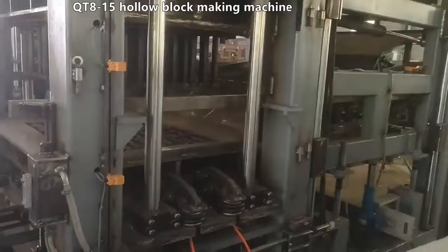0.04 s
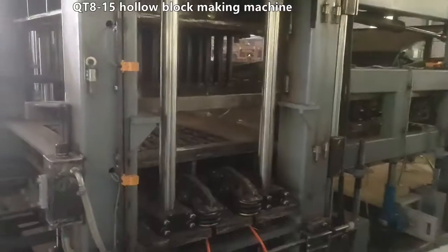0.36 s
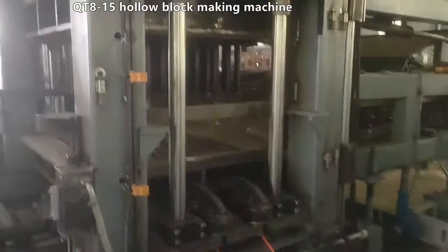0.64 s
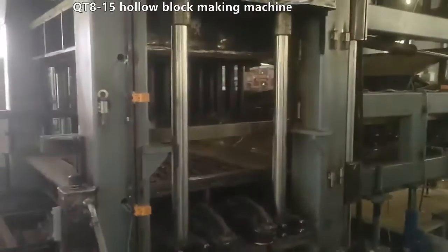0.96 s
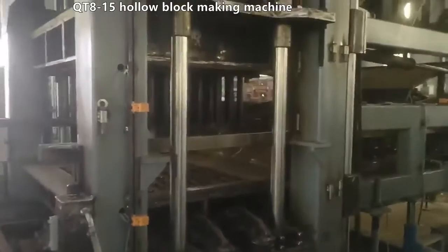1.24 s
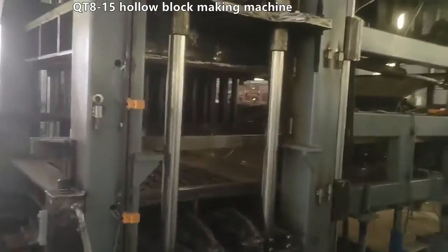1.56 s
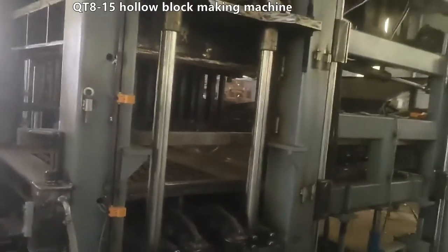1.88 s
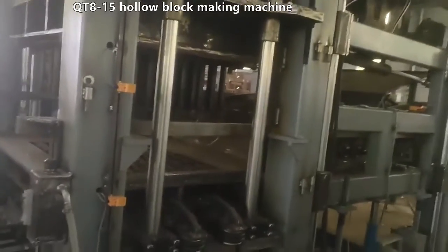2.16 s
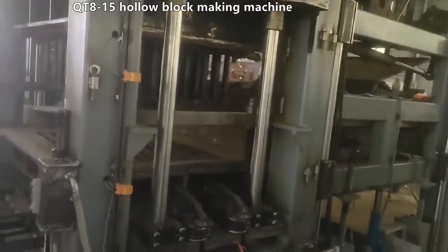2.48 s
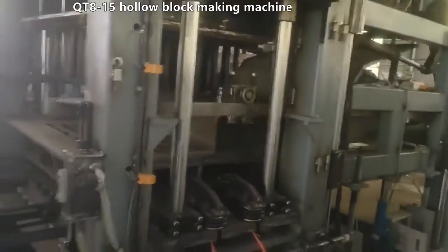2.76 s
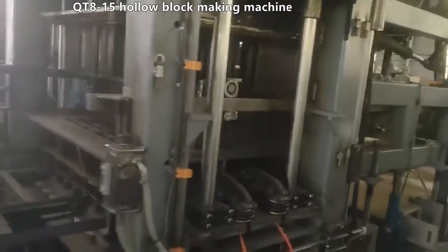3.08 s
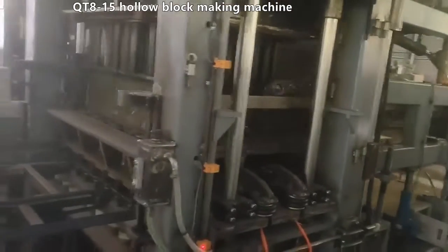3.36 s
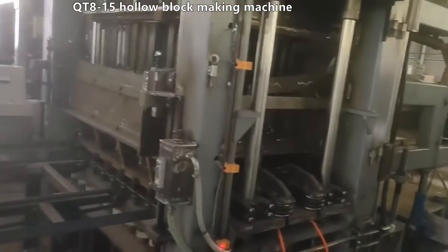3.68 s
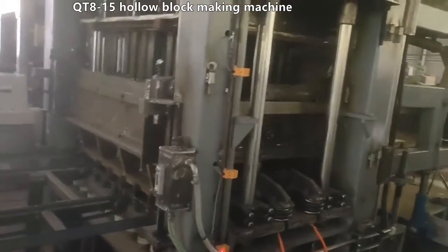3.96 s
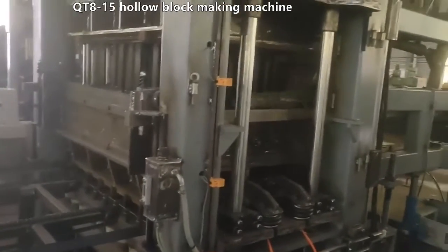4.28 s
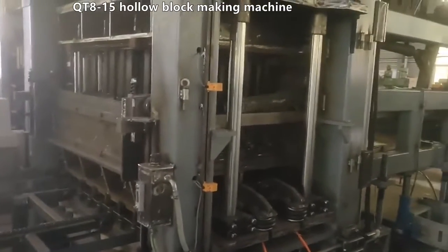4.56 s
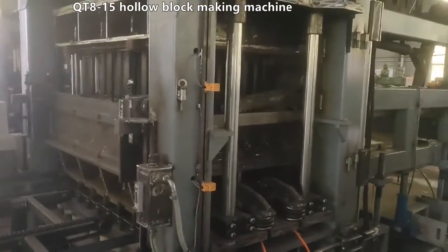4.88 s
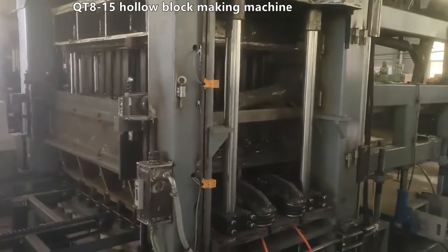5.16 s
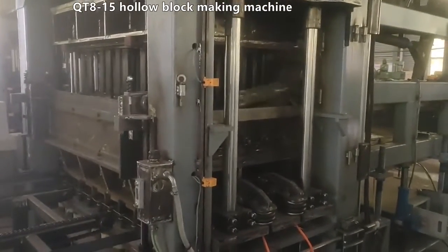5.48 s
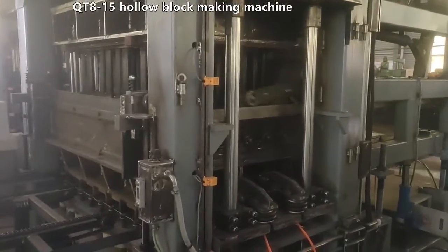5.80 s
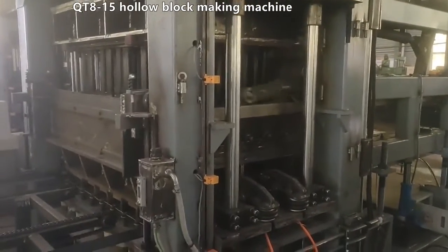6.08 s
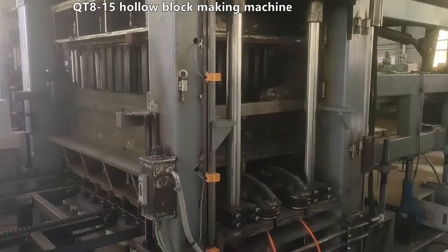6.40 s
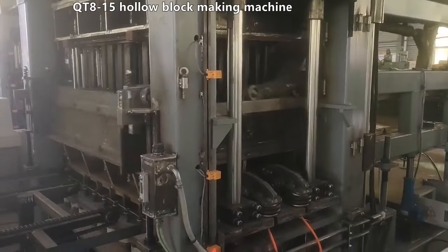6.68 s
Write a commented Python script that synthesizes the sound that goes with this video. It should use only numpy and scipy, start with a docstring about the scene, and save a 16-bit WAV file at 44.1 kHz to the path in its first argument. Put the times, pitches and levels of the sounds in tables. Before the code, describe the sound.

A concrete block making machine is heard from nearby in a reverberant factory hall. A steady, fairly quiet hydraulic hum with a faint hiss fades in and continues throughout. At about 2.4 seconds the feed carriage sets off, rumbling and scraping while grit trickles over steel. Irregular metal clanks ring out until 4 seconds, the strongest near 3 seconds, and a rail groans briefly around 3.7 seconds. The rumble then eases, with a few stone clicks. From about 4.5 to 5.5 seconds a rake crunches softly to and fro, about seven strokes a second, growing slightly. Around 5.4 seconds a faint high whine appears and a motor spins up, rising in pitch. By 6 seconds the machine is roaring with deep, strong vibration, its steel mould hammering and rattling rapidly. This is the loudest part and lasts until the end, near 7 seconds.

```python
"""Concrete block machine in a factory hall

A hydraulic pump hums throughout. The feed carriage rolls over the mould with rumble, scraping and
clanks, then its rake beats to and fro while grit falls. Inverter-driven motors spin up the eccentric
weights of the vibrating table, and the steel mould lifts off, hammering and rattling on it."""
import sys
import numpy as np
from scipy import signal
from scipy.fft import rfft, irfft
from scipy.io import wavfile
from scipy.ndimage import uniform_filter1d, minimum_filter1d

SR = 44100
rng = np.random.default_rng(int(sys.argv[2]) if len(sys.argv) > 2 else 0)


def generate_wav(signal):
    """Clip the signal to [-1, 1] and save it as 16-bit WAV at the path in sys.argv[1]."""
    frames = np.transpose(np.atleast_2d(signal))
    scaled = np.clip(frames, -1, 1) * 32767
    pcm = np.round(scaled).astype(np.int16)
    wavfile.write(sys.argv[1], SR, pcm)


N = 306054
TIME = np.arange(N) / SR
FULL_SPEED_HZ = 48.3  # turns per second of the vibrator shaft

# blows on the carriage: start_s, peak_db, t60_s, frame_thud_db, favoured_pitch_hz, box_ring_db
CLANKS = [(2.451,-21,0.2,-29,700,-25),(2.617,-14,0.22,-30,1230,-23),(2.634,-16.5,0.15,-30,1150,-22),(2.762,-21,0.06,-27,1140,-28),(2.857,-16,0.17,-22,800,-19),(2.947,-23,0.15,-23,2060,-31),(3.009,-10,0.09,-17.5,1535,-16),(3.022,-15.5,0.06,-28,2750,-26),(3.236,-17.5,0.27,-26,2750,-22),(3.452,-17,0.12,-14.5,1810,-21),(3.464,-13.5,0.12,-22,1900,-19),(3.515,-30,0.12,-18.5,612,-26),(3.658,-20,0.06,-27,1370,-28),(3.722,-29,0.3,-22,800,-29),(4.005,-21,0.07,-32,2050,-30)]


def amp(db):
    """Decibels as an amplitude ratio."""
    return 10 ** (np.asarray(db) / 20)


def unit(x):
    """Normalisation to rms 1."""
    return x / np.sqrt(np.mean(x ** 2) + 1e-20)


def read(points, hz):
    """Interpolation of a table on a logarithmic frequency axis."""
    f, value = np.transpose(points)
    return np.interp(np.log(hz + 1), np.log(f + 1), value)


def during(start_s, end_s, rise_s, fall_s):
    """Trapezoidal envelope, fully open from start_s to end_s."""
    return np.clip((TIME - start_s) / rise_s + 1, 0, 1) * np.clip((end_s - TIME) / fall_s + 1, 0, 1)


def swell(centre_s, width_s):
    """Gaussian envelope of peak 1."""
    return np.exp(-((TIME - centre_s) / width_s) ** 2)


def above(speed, threshold_hz, width_hz):
    """Logistic step from 0 to 1 as the speed passes a threshold."""
    return 1 / (1 + np.exp((threshold_hz - speed) / width_hz))


def add(mix, start_s, sound):
    """Superposition of a sound on the mix."""
    part = mix[round(start_s * SR):][:len(sound)]
    part += sound[:len(part)]


def tone(cycles):
    """Sinusoid of rms 1, from its phase in cycles."""
    return np.sqrt(2) * np.sin(2 * np.pi * cycles)


def wander(hz):
    """Low-pass Gaussian noise of rms 1, fluctuating at up to about hz."""
    f = np.fft.rfftfreq(N, 1 / SR)
    return unit(irfft(rfft(rng.standard_normal(N)) * np.exp(-(f / hz) ** 2) * (f > 0), N))


def resonant(hz, width_hz):
    """A randomly driven resonance gives narrow-band noise; rms 1."""
    phase = 2 * np.pi * np.cumsum(hz * np.ones(N)) / SR
    return wander(width_hz) * np.cos(phase) + wander(width_hz) * np.sin(phase)


def colour(x, spectrum):
    """Minimum-phase filter of unit energy with the given spectral shape."""
    log_gain = np.log(amp(read(spectrum, abs(np.fft.fftfreq(4096, 1 / SR)))))
    taps = np.fft.ifft(np.exp(np.conj(signal.hilbert(log_gain)))).real
    return signal.oaconvolve(x, taps / np.linalg.norm(taps))[:len(x)]


def grains(per_s, spread_db):
    """Shot noise: tiny impacts at random times, a few of them large; rms 1."""
    size = amp(spread_db * np.minimum(rng.exponential(1, N), 4))
    return unit(size * rng.choice([-1, 1], N) * (rng.random(N) < per_s / SR))


def hall(x, wet_db):
    """Reverberation: a diffuse tail whose highest treble dies first; keeps the power."""
    # reverberation time: frequency_hz, t60_s
    decay = [(100,1),(1000,0.75),(4000,1),(12000,0.11)]
    hz, t, spectra = signal.stft(rng.standard_normal(SR), SR, nperseg=256)
    tail = signal.istft(spectra * amp(-60 * t / read(decay, hz)[:, None]), SR, nperseg=256)[1]
    wet = signal.fftconvolve(x, tail / np.linalg.norm(tail))[:N]
    return (x + amp(wet_db) * wet) / np.hypot(1, amp(wet_db))


def oil_load():
    """Hydraulic load, rising from 0 at idle to 1."""
    # oil pressure: time_s, load_fraction
    pressure = [(2.4,0),(3,.7),(5.3,1)]
    return np.interp(TIME, *np.transpose(pressure))


def pump(shaft_hz=24.95):
    """Flow ripple: pistons give tones and faint shaft harmonics, and modulate the rush of oil."""
    # piston tones: pitch_hz, relative_db, change_under_load_db
    piston_tones = [(100.3,-48.5,-7),(249.7,-53.5,-2),(274.5,-57.5,-3),(299.9,-49,0),(347,-50.5,4),(374.3,-56,-3),(398.6,-54,-5),(598.9,-54.3,-7),(623.8,-70,11),(823.8,-65,-3),(848.5,-55.3,-10),(898.4,-69,-3),(1148,-66.5,-3),(1995,-67,0)]
    # oil rush in the hall: frequency_hz, density_db
    rush_spectrum = [(15,-26),(28,-1),(60,-4),(106,-4.5),(160,-7.5),(219,-8.5),(310,-4),(407,-8),(555,-16.5),(780,-17),(954,-23.5),(1500,-25.5),(2100,-21),(4500,-36.5),(12000,-42.5)]
    clock, load = TIME + .00006 * wander(3), oil_load()
    tones = sum(amp(db + load * loaded_db + 1.3 * wander(6)) * tone(hz * clock + rng.random())
                for hz, db, loaded_db in piston_tones)
    harmonics = sum(amp(read(rush_spectrum, hz)) * tone(hz * clock + rng.random())
                    for hz in np.arange(17, 110) * shaft_hz)
    ripple = 1 + .08 * sum(np.cos(2 * np.pi * k * shaft_hz * clock) for k in (3, 4, 7))
    flow = unit(colour(grains(12000, 1.2) * ripple, rush_spectrum))
    gurgle = signal.sosfilt(signal.butter(1, 900, fs=SR, output="sos"), flow)
    rush = flow * amp(wander(29)) + .15 * gurgle * wander(29)
    return amp(-1.14) * tones + amp(-53.5) * unit(harmonics) + amp(-41.5) * rush


def valve():
    """Flow noise: oil hisses and ticks through the valve, more softly under load."""
    # valve hiss: frequency_hz, density_db
    hiss = [(3000,-32),(4600,-20),(5400,-1),(6600,4.5),(7600,-6.5),(9200,-3.5),(12000,-16.5)]
    level_db = -58 - 3 * oil_load() + wander(7)
    return amp(level_db) * unit(colour(grains(2500, 2.4), hiss))


def panels():
    """Panel resonance: steel sheets of the frame swell into brief booms."""
    # booms: centre_s, width_s, pitch_hz, level_db
    booms = [(.49,.08,103,-42.5),(.84,.07,126,-43),(5.753,0.06,120,-23),(5.81,.06,765,-36),(5.83,0.051,655,-28.5),(5.855,0.11,108.4,-21.5),(5.92,0.052,254.7,-21.5),(5.957,0.031,355,-30),(6.015,0.069,164,-16.5),(6.163,0.064,306.4,-16.5)]
    return sum(amp(db) * swell(s, width) * resonant(hz, 26) for s, width, hz, db in booms)


def trip(start_db, rolling_db, parked_db, lag_s, ease_s):
    """Level envelope in dB of a carriage noise: it runs up, holds, and eases lag_s after the stop."""
    set_off_s, run_up_s, stop_s = 2.42, .18, 3.92
    run_up = np.clip((TIME - set_off_s) / run_up_s, 0, 1)
    rolling = .5 - .5 * np.tanh((TIME - stop_s - lag_s) / ease_s)
    return parked_db + rolling * (start_db + run_up * (rolling_db - start_db) - parked_db)


def carriage():
    """Rolling and friction noise: wheels jolt the frame, steel grinds gravel, grit slides and dances."""
    # wheel rumble, frame shudder, scraping steel and falling grit: frequency_hz, density_db
    rumble_spectrum = [(20,-14),(55,-28.5),(110,5),(180,2),(270,-3.5),(400,-14.5),(650,-10),(1000,-72),(3000,-49)]
    shudder_spectrum = [(15,-10),(32,-5),(55,-5),(75,4.5),(100,1.5),(160,-21),(400,-78)]
    scrape_spectrum = [(150,-30),(450,-2),(660,5),(900,-1),(1400,-3),(2000,-6.5),(2800,-12),(3600,-20.5),(4600,-50),(9000,-42.5)]
    grit_spectrum = [(2500,-20),(3800,8.5),(4600,-3.5),(5500,8),(6800,7.5),(8500,-0.5),(12000,-11)]
    # lurches of the frame: centre_s, level_db
    lurches = [(2.55,-45),(2.74,-37),(3.38,-35.5),(3.82,-31.5),(4.04,-33),(4.441,-41)]
    # spills of grit over the steel, and one broad swell of treble hiss as the motors spin up (the long row near
    # 5.5 s): centre_s, width_s, level_db
    spills = [(2.63,0.046,-50),(2.883,0.17,-49.5),(3.225,0.096,-51.5),(3.473,0.085,-54),(4.126,0.086,-67),(4.867,0.16,-58),(5.513,0.44,-59),(5.815,0.085,-41.5),(6.197,0.05,-47),(6.383,.04,-48)]
    moving = during(CLANKS[0][0], 5.6, .006, .3)
    rumble_db = trip(start_db=-39, rolling_db=-30, parked_db=-41.5, lag_s=.35, ease_s=.33)
    scrape_db = trip(start_db=-41, rolling_db=-30.5, parked_db=-49, lag_s=.0077, ease_s=.16)
    shudder_db = trip(start_db=-55, rolling_db=-41.5, parked_db=-47, lag_s=.78, ease_s=.31)
    grit_db = trip(start_db=-51, rolling_db=-53.5, parked_db=-69, lag_s=.55, ease_s=.14)
    lurching = sum(amp(db) * swell(s, .087) for s, db in lurches)
    spilling = sum(amp(db) * swell(s, width) for s, width, db in spills)
    jolts = wander(26)
    rumble = unit(colour(grains(500, 3.4), rumble_spectrum)) * amp(rumble_db + .7 * jolts)
    shudder = unit(colour(grains(300, 1), shudder_spectrum)) * np.hypot(amp(shudder_db), lurching)
    box_ring = amp(-10) * resonant(633.7, 36)  # sliding rubs the box's lowest resonance
    grinding = unit(hall(colour(grains(1500, 3.2), scrape_spectrum), wet_db=-4))
    scrape = (grinding + box_ring) * amp(scrape_db + 1.1 * jolts)
    grit = unit(colour(grains(2500, 2.2), grit_spectrum)) * amp(1.8 * wander(25))
    grit_gain = amp(grit_db) * moving + spilling + shaking(full_db=-44.5, power=3)
    return (rumble + shudder + scrape) * moving + grit * grit_gain


def rail_groan(start_s=3.63, end_s=3.74, start_hz=664, climb_hz_per_s=420):
    """Stick-slip friction: the rail groans, rising in pitch as the carriage nears its stop."""
    hz = start_hz + climb_hz_per_s * (TIME - start_s)
    slips = .55 * resonant(hz, 40) + .7 * resonant(hz, 120)
    return amp(-28) * slips * during(start_s, end_s, .06, .13)


def rake(start_s=4.565, period_s=.1382, width_s=.043, growth_db=.86):
    """Granular noise: the rake bites into wet concrete, then beats steadily, harder each stroke."""
    # crunch: frequency_hz, density_db
    crunch = [(200, 4.5), (650, 5.5), (1100, 0), (2100, 4.5), (3000, -4.5), (4500, -27),
              (6500, -10), (12000, -31)]
    bite = amp(-41) * swell(4.19, width_s)
    strokes = sum(amp(-45 + k * growth_db) * swell(start_s + k * period_s, width_s) for k in range(8))
    return (bite + strokes) * unit(colour(grains(2000, 1.7), crunch))


def strike(spectrum, t60_s, crack):
    """Impact response: a contact impulse, then dense plate modes as decaying noise; peak 1."""
    t = np.arange(SR // 2) / SR
    ring = rng.standard_normal(len(t)) * amp(-60 * t / t60_s)
    ring[0] = -crack
    blow = colour(ring, spectrum)
    return blow / abs(blow).max()


def steel_box(focus_hz, db_per_octave=12):
    """Modal ringing of the carriage's box, strongest near the pitch the struck spot favours; peak 1."""
    # box modes: pitch_hz, level_db, t60_s
    modes = [(614,4.5,0.26),(822,8,0.094),(1156,-3,0.084),(1214,3.5,0.14),(1356,0,0.17),(1535,4.5,0.085),(1660,-7,0.051),(1785,-0.5,0.16),(2030,-1,0.14),(2230,-4,0.077),(2510,3.5,0.084),(2680,2,0.2),(2800,-4,0.14)]
    t = np.arange(SR // 2) / SR
    ring = sum(amp(db - db_per_octave * abs(np.log2(hz / focus_hz)) - 60 * t / t60)
               * tone(hz * t + rng.random()) for hz, db, t60 in modes)
    return ring / abs(ring).max()


def knocks():
    """Impact excitation: clanks ring the box and thud in the frame; stones click on the plates."""
    # steel clank, frame thud and stone click: frequency_hz, density_db
    clank_spectrum = [(60,-7),(150,11),(270,8.5),(450,-5),(700,0),(1500,-3.5),(2800,-6.5),(4500,-28),(6300,-25),(12000,-50)]
    thud_spectrum = [(50,-14),(130,-2),(200,-0.5),(260,8),(330,-4),(480,-21),(1200,-46)]
    click_spectrum = [(700,-12),(1600,5),(3000,3),(4500,-0.5),(6000,10),(8000,4.5),(12000,-5)]
    # stones hitting steel: start_s, peak_db, t60_s
    clicks = [(.419,-37,0.075),(1.813,-40,0.11),(2.853,-33,0.11),(3.723,-32,0.11),(3.8,-32.5,0.09),(4.005,-24,0.097),(4.014,-23,0.033),(4.273,-29.5,0.022),(4.771,-32,0.09),(4.789,-34,0.1)]
    mix = np.zeros(N)
    for s, db, t60, thud_db, focus_hz, ring_db in CLANKS:
        add(mix, s, amp(db) * strike(clank_spectrum, t60, crack=13))
        add(mix, s, amp(ring_db) * steel_box(focus_hz))
        add(mix, s, amp(thud_db) * strike(thud_spectrum, .16, crack=19))
    for s, db, t60 in clicks:
        add(mix, s, amp(db) * strike(click_spectrum, t60, crack=1.2))
    return hall(mix, wet_db=-6.5)


def shaft_speed(start_s=5.27, ramp_hz_per_s=55, knee=10):
    """Uniform acceleration of the vibrator shaft, easing into full speed; turns per second."""
    ramp = ramp_hz_per_s * np.maximum(TIME - start_s, 0)
    return ramp / (1 + (ramp / FULL_SPEED_HZ) ** knee) ** (1 / knee)


def shaking(full_db, power):
    """Power law of speed: the gain of a table noise, setting in as the mould lifts off."""
    speed = shaft_speed()
    lifted = above(speed, 22.1, 2.43)
    return amp(full_db) * lifted * (speed / FULL_SPEED_HZ) ** power


def inverter(rectifier_hz=300):
    """Modulation sidebands of the switching whine fan out with speed, over hum and a rough motor note."""
    # switching whine: carrier_hz, top_sideband_db, other_sidebands_db
    carriers = [(5010,-62.5,-63),(9990,-65,-61)]
    motor_hz = 21 * shaft_speed()
    motor_phase = 2 * np.pi * np.cumsum(motor_hz * (1 + .02 * wander(60))) / SR
    whine = sum(amp(db + 2 * wander(25)) * tone(np.cumsum(hz + offset * motor_hz + 40 * wander(120)) / SR)
                for hz, top_db, other_db in carriers
                for offset, db in ((-.38, other_db), (.78, top_db), (.74, other_db)))
    hum = amp(-39.5) * tone(rectifier_hz * TIME) * amp(1.7 * wander(14))
    note = amp(-28) * np.sin(motor_phase) * amp(2 * wander(50))
    note += amp(-37) * resonant(2 * motor_hz, 45)
    return (whine * during(5.38, 5.56, .1, .25) + hum * during(5.4, 5.7, .08, .2)
            + note * during(5.66, 5.7, .08, .07))


def table_sway(turns):
    """Rotating unbalance: eccentric weights drive the table at the shaft rate and its overtones."""
    # sway at full speed: harmonic_number, level_db
    harmonics = [(1,-20.3),(2,-24.7),(3,-28)]
    sway = sum(tone(k * turns) * shaking(full_db=db, power=.71 * k) for k, db in harmonics)
    return sway * amp(.37 * wander(22))


def frame_ring(speed, turns):
    """Forced vibration: harmonics of even landings climb through the frame's stationary resonances."""
    # frame response at full speed: harmonic_number, relative_db
    harmonics = [(3,-22),(4,-8),(5,-5),(6,0.5),(7,-5.5),(8,-10),(9,-25),(10,-23),(11,-22.5),(12,-29),(13,-29),(14,-14),(15,-28)]
    response = [(k * FULL_SPEED_HZ, db) for k, db in harmonics]
    ring = sum(amp(read(response, k * speed) + 1.5 * wander(9))
               * tone(k * turns + .11 * rng.standard_normal()) for k, _ in harmonics)
    return ring / np.sqrt(sum(amp(db) ** 2 for _, db in harmonics))


def mould_hammer(speed, turns):
    """Periodic impacts: the mould lands once a turn, as harmonics when seated, as noise when loose."""
    # loose blows: frequency_hz, density_db
    blow_spectrum = [(40,-47),(70,-9),(105,-5),(160,-3.5),(212,-10),(250,5),(295,2.5),(335,4.5),(372,-2.5),(415,-13),(800,-16),(2000,-58.5)]
    pace = speed / FULL_SPEED_HZ
    seated = during(6.48, 6.63, .24, .037)  # the mould beds down, then breaks loose
    evenness = (.25 + .65 * seated) * pace
    uneven_turns = turns + .006 * wander(45)
    landing_squarely = above(speed, 32.7, .79)
    even = frame_ring(speed, uneven_turns) * landing_squarely * shaking(full_db=-11.5, power=.2)
    depth = .6 - .2 * pace
    throb = (1 + depth * np.cos(2 * np.pi * uneven_turns)) / np.sqrt(1 + depth ** 2 / 2)
    blows = unit(hall(colour(grains(2500, 1), blow_spectrum), wet_db=-7))
    loose = blows * throb * shaking(full_db=-12.5, power=1.27)
    return np.sqrt(evenness) * even + np.sqrt(1 - evenness) * loose


def mould_rattle(speed, turns, landing_turns=.45, decay_turns=.33):
    """Contact chatter: each landing sets off a decaying burst of small steel impacts."""
    # rattling steel: frequency_hz, density_db
    rattle_spectrum = [(200,-0.5),(470,4.5),(570,0.5),(675,6),(800,2.5),(1100,0),(1600,0.5),(2050,2.5),(2700,-3.5),(3500,-14.5),(4600,-25),(5800,-20.5),(8000,-29),(12000,-58)]
    since_landing = (turns - landing_turns + .09 * wander(30)) % 1
    burst = np.exp(-since_landing / decay_turns) * amp(1.5 * wander(30))
    between = .85 - .4 * above(speed, 47.6, .15)  # less rattle between landings at settled speed
    chatter = grains(5000, 1.8) * (between + burst) / (between + .4) * amp(.9 * wander(60))
    surge_db = 4 * above(speed, 44.1, .32) + 3 * swell(6.21, .042)  # loose steel joins near full speed
    rattle = unit(hall(colour(chatter, rattle_spectrum), wet_db=-7))
    return rattle * shaking(full_db=-22.5, power=.16) * amp(surge_db)


def vibrator():
    """Phase locking: one shaft times the table's sway and the mould's hammering and rattle."""
    speed = shaft_speed()
    turns = np.cumsum(speed) / SR
    return table_sway(turns) + mould_hammer(speed, turns) + mould_rattle(speed, turns)


def scene():
    """Superposition of all parts of the machine, in one channel."""
    background = pump() + valve() + panels()
    feed = carriage() + rail_groan() + rake() + knocks()
    return (background + feed + inverter() + vibrator())[None]


def record(dry, ceiling=.6, cutoff_hz=12200):
    """Opening fade, fast peak limiting and a low-pass band limit."""
    fade = np.clip((TIME - .14) / .32, 1e-9, 1) ** .57
    x = dry[0] * fade
    limiter_gain = (1 + (x / ceiling) ** 10) ** (-1 / 10)
    x = x * uniform_filter1d(minimum_filter1d(limiter_gain, size=90), size=90)
    low_pass = signal.firwin(511, cutoff_hz, window=("kaiser", 9), fs=SR)
    return signal.oaconvolve(x, low_pass, "same")[None]


dry = scene()
out = record(dry)
generate_wav(out)
```